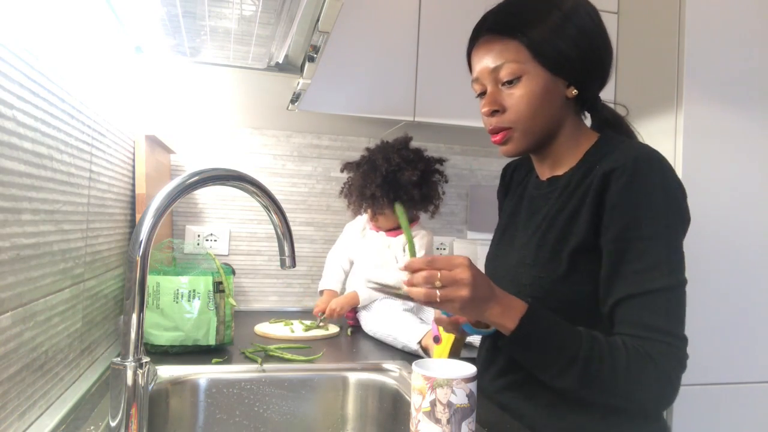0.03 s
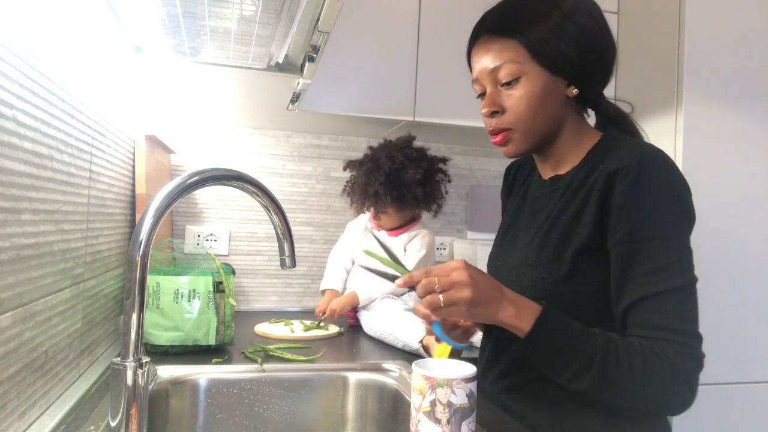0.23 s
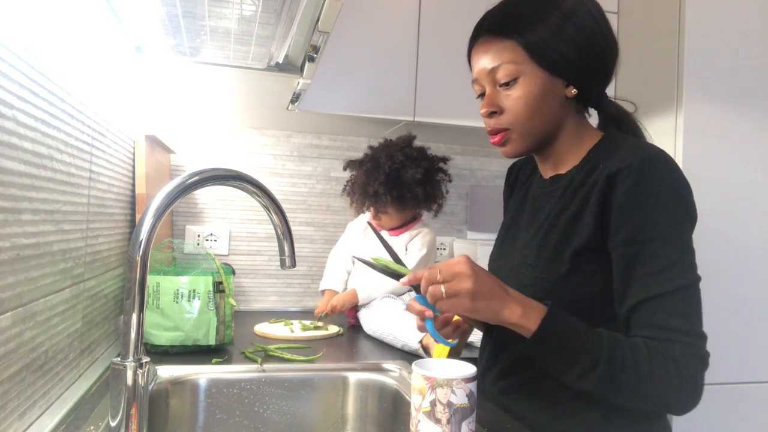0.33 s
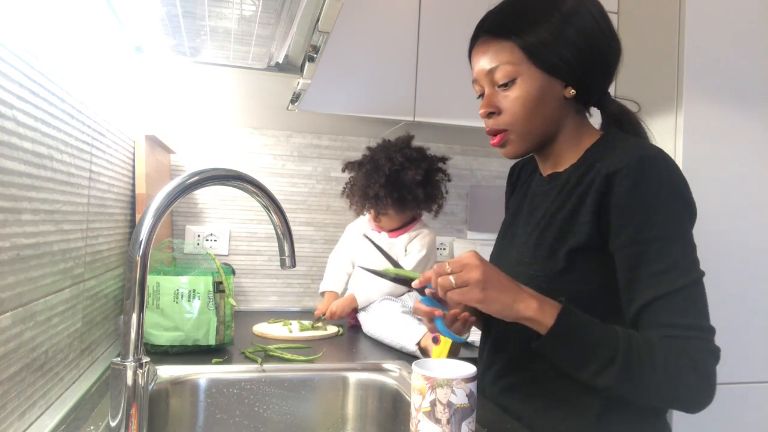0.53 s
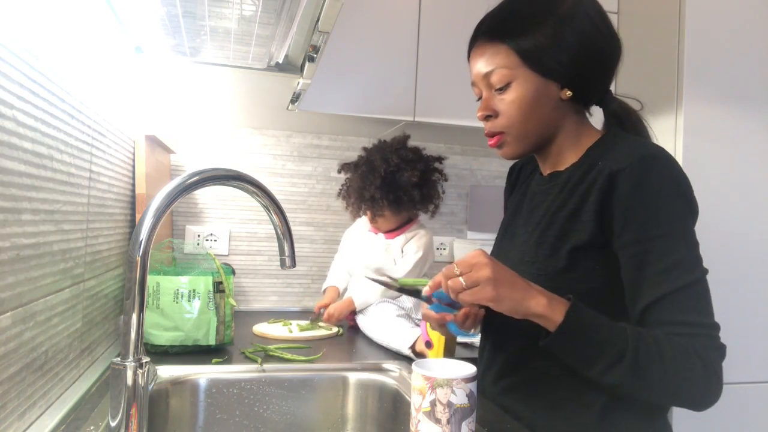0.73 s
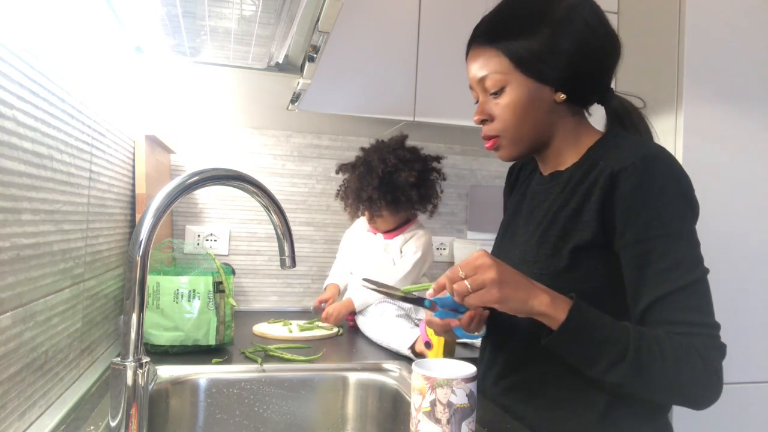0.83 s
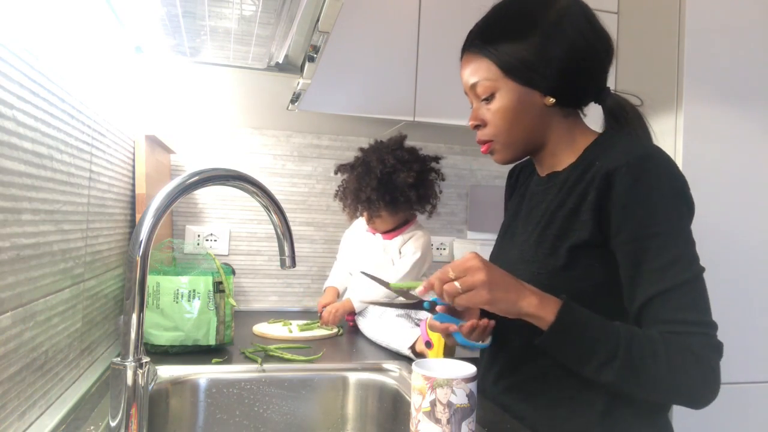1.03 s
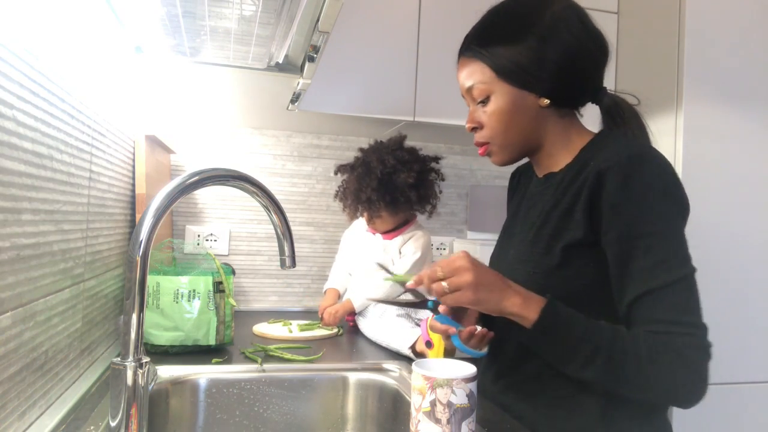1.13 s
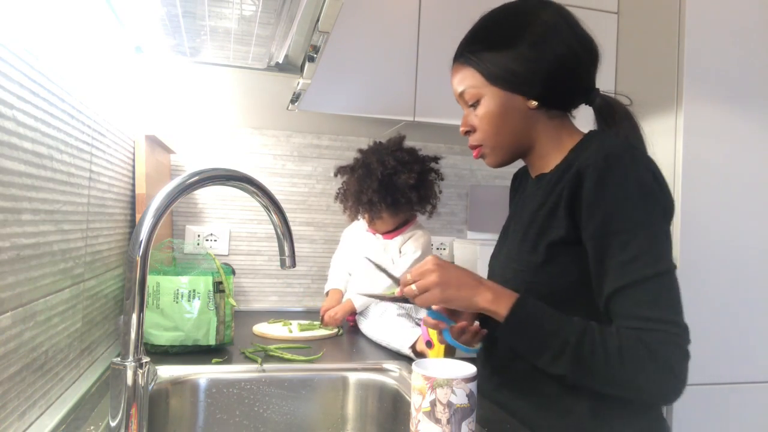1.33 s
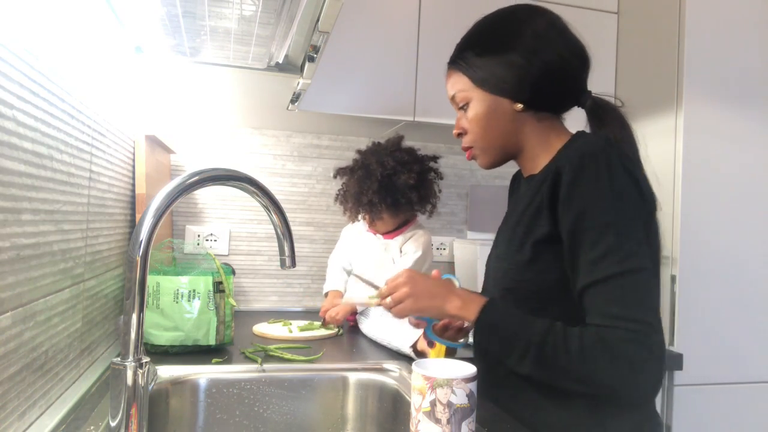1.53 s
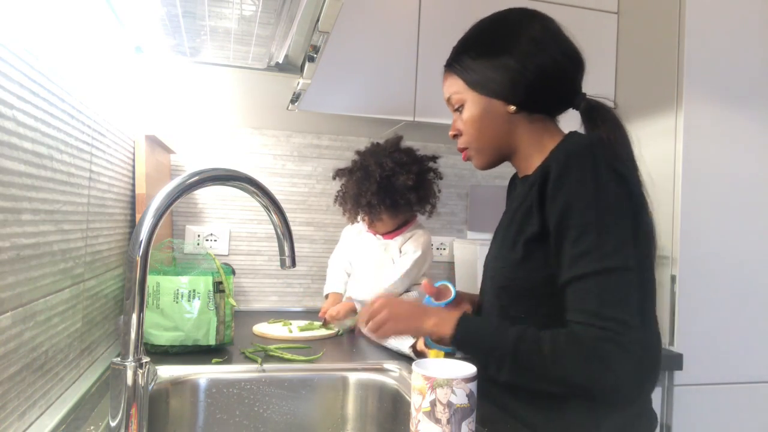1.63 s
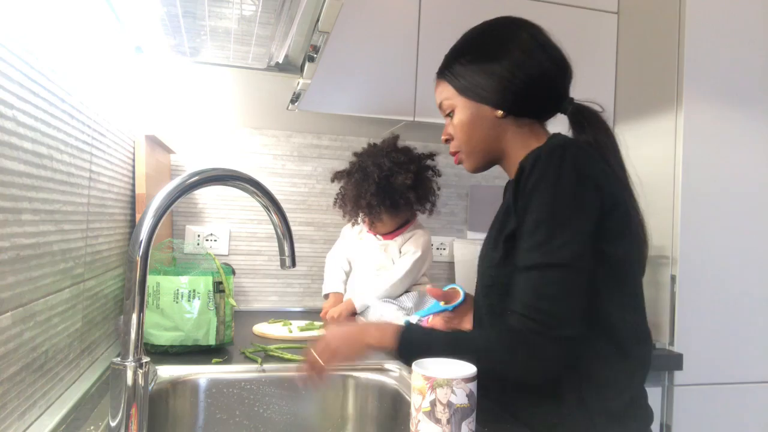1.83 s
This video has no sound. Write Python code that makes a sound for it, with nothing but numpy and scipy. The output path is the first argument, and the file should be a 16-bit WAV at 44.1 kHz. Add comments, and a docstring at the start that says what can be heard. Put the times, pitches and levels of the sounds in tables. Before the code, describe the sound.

Green beans being snipped, with a piece clanging into a metal sink and faint scissor clicks.

```python
"""Snipping green beans over a sink

In a small quiet kitchen, a cut bean end drops into a steel sink and bounces, making it ring.
Scissor blades click and crunch through the fibres of a bean, and the piece lands with a hollow tap.
A softer second cut and light knocks of handling follow, over faint mains hum and room noise."""
import sys
import numpy as np
from scipy import signal
from scipy.fft import rfft, irfft, next_fast_len
from scipy.io import wavfile

SR = 44100
rng = np.random.default_rng(int(sys.argv[2]) if len(sys.argv) > 2 else 0)


def file_out(sig):
    """Save sig as 16-bit WAV at sys.argv[1]."""
    # one column per channel
    cols = np.atleast_2d(sig).T
    # limit, then scale
    lim = np.clip(cols, -1, 1)
    pcm = np.round(lim * 32767).astype(np.int16)
    wavfile.write(sys.argv[1], SR, pcm)


N = 83790
SCENE_TIME = np.arange(N) / SR
EVENT_TIME = np.arange(int(.7 * SR)) / SR  # seconds since the start of one short sound


# Bounces of the bean end: start_s, level_db, high_cut_hz, resonance_q, low_cut_hz, smack_db
BOUNCE_HITS = [(.191, -15.5, 4070, 0.83, 176, -56), (0.3702, -25, 1300, 4.7, 142, -42.5),
               (0.4548, -43, 1170, 7.8, 285, -58)]
# Ringing tones of the steel basin: pitch_hz, level_db, fade_s (time to fall by 60 dB)
BASIN_TONES = [(140.5, -15, 0.36), (233, -15, 0.15), (337.7, -5, 0.18), (369, -1, .1), (404, -5, 0.054),
               (525, -10.5, 0.099), (572, -11.5, 0.061), (632.8, -0.5, 0.1), (854.4, -7, 0.12),
               (910, -5, 0.11), (962, -6.5, 0.061), (1285, -9.5, 0.085), (1623, -9.5, 0.14),
               (1793, -20, 0.11), (1995, -11.5, 0.061), (2240, -16.5, 0.089), (2632, -21, 0.19),
               (3100, -36, .14), (3195, -10, 0.052), (4400, -10.5, 0.067)]
# The basin's many brief tones, blurred into a clang: pitch_hz, level_db
CLANG_SPECTRUM = [(50, -34), (110, -27), (240, 3), (400, -13), (550, -13), (850, -1.5), (1450, -5),
                  (2100, -2), (2800, -6.5), (3200, -2.5), (4200, -4), (5000, -13), (6500, -7),
                  (9000, -29.5), (16000, -3)]
# The wet smack of the bean: pitch_hz, level_db
SMACK_SPECTRUM = [(50, -29), (300, -1), (2500, 11), (5500, 4.5), (9000, -22), (12000, -4), (16000, -13)]

def sink_bounces():
    """Each bounce rings the basin; a softer contact shuts out its high tones."""
    out = np.zeros(N)
    for start_s, level_db, high_cut_hz, q, low_cut_hz, smack_db in BOUNCE_HITS:
        ring = amp(-5) * sum(tone(*row, rise_s=0.00072) for row in BASIN_TONES)
        burst = amp(-1.5) * fade(0.019, rise_s=0.0016, hold_s=0.0042)
        tail = amp(-13) * fade(0.27)
        clang = noise(CLANG_SPECTRUM) * (burst + tail)
        low_cut = lambda hz: (1j * hz / (low_cut_hz + 1j * hz)) ** 2
        high_cut = lambda hz: 1 / (1 - (hz / high_cut_hz) ** 2 + 1j * hz / (high_cut_hz * q))
        basin = filtered(ring + clang, lambda hz: low_cut(hz) * high_cut(hz))
        smack = noise(SMACK_SPECTRUM) * fade(0.051)
        add(out, start_s, amp(level_db) * basin + amp(smack_db) * smack)
    return out


# Sharp clicks of the blades: start_s, level_db, fade_s, tilt_db_per_octave, ring_db
BLADE_CLICKS = [(0.5269, -40, 0.065, 1, -43), (.544, -39.5, .05, -8.5, -58), (.567, -47, 0.081, -10.5, -68),
                (0.7678, -36.5, 0.0075, 13, -56), (0.7702, -51, 0.27, 12.5, -65)]
# The noise of a click in the blades and pivot: pitch_hz, level_db
CLICK_SPECTRUM = [(40, -48), (200, -9.5), (700, -27), (1050, 1.5), (1400, -7), (1800, 0.5), (2300, -1.5),
                  (3000, 0.5), (3900, 0), (4800, -5.5), (6200, -6), (9000, -22), (16000, -28)]
# Steel blades ringing after a click: pitch_hz, level_db, fade_s
BLADE_TONES = [(1780, -5.5, .12), (2690, -7, 0.11), (3280, -5, .12), (3820, -1.5, 0.056)]
# Blades sliding over each other: middle_s, level_db, width_s
BLADE_SLIDES = [(.0, -60, 0.029), (.305, -59, 0.0034), (.365, -58.5, 0.042), (0.388, -53.5, 0.011),
                (.80, -65.5, 0.043), (1.185, -63.5, 0.0079), (1.429, -64.5, 0.042), (1.715, -68.5, 0.025)]
# The hiss of that sliding: pitch_hz, level_db
SLIDE_SPECTRUM = [(300, -4), (1500, 0.5), (3500, 1), (6300, -0.5), (10000, -8), (16000, -9.5)]

def scissor_blades():
    """The blades click and slide, and the pivot gives one tiny squeak."""
    out = np.zeros(N)
    for start_s, level_db, fade_s, tilt_db, ring_db in BLADE_CLICKS:
        ring = sum(tone(*row, rise_s=.0005) for row in BLADE_TONES)
        click = noise(CLICK_SPECTRUM, tilt_db) * fade(fade_s)
        add(out, start_s, amp(level_db) * click + amp(ring_db) * ring)
    sliding = sum(amp(db) * swell(middle_s, width_s) for middle_s, db, width_s in BLADE_SLIDES)
    out += coloured(rng.standard_normal(N), SLIDE_SPECTRUM) * sliding
    squeak = narrow_noise(pitch_hz=13700, width_hz=1200) * swell(middle_s=1.599, width_s=0.0019)
    return out + amp(-58.5) * squeak


# The pod being cut, rubbed or skidding:
# start_s, level_db, onset_s, fade_s, tilt_db_per_octave, ring_hz, ring_db
POD_CRUNCHES = [(0.445, -40.5, 0.0087, 0.12, -7, 1014, 4.5), (0.7379, -51, 0.0017, 0.053, -9.5, 1006, 13),
                (0.758, -54, 0.014, 0.064, -5, 1020, 9), (0.804, -43, 0.0064, 0.035, 4, 1860, 15),
                (1.288, -67, 0.035, 0.36, 1, 2160, 10), (1.42, -55, 0.0087, 0.072, 6, 1290, 19),
                (1.437, -50, .003, 0.073, 4, 905, 25.5)]
# The noise of the pod: pitch_hz, level_db
POD_SPECTRUM = [(150, -13), (500, -10.5), (1000, -2), (1450, 0), (1900, -0.5), (2500, -0.5), (4000, -4.5),
                (7000, -8.5), (10000, -15.5), (16000, -22)]
SNAPS_PER_S, JUICE_GAIN, CRUNCH_Q = 2200, 0.73, 20.6  # a higher Q gives a narrower ring

def bean_crunches():
    """Tiny fibres snap over a juicy hiss, ringing at one pitch at the point of contact."""
    out = np.zeros(N)
    n = len(EVENT_TIME)
    for start_s, level_db, onset_s, fade_s, tilt_db, ring_hz, ring_db in POD_CRUNCHES:
        snaps = unit((rng.random(n) < SNAPS_PER_S / SR) * rng.standard_normal(n))
        juice = JUICE_GAIN * rng.standard_normal(n)
        crackle = coloured(snaps + juice, POD_SPECTRUM, tilt_db)
        peak = lambda hz: 1j * hz / (CRUNCH_Q * (ring_hz - hz ** 2 / ring_hz) + 1j * hz)
        crunch = unit(filtered(crackle, lambda hz: 1 + amp(ring_db) * peak(hz)))
        add(out, start_s, amp(level_db) * crunch * fade(fade_s, rise_s=onset_s / 2, hold_s=onset_s))
    return out


# The tick as the cut piece lands: pitch_hz, level_db
TICK_SPECTRUM = [(100, -23), (1000, -18), (2400, -6), (3600, 3), (4600, -3), (5200, -3), (7500, -6),
                 (10000, -15.5), (16000, -22)]
# The hollow ring of the tap: pitch_hz, level_db, fade_s, rise_s
TAP_TONES = [(173.3, -9.5, 0.4, 0.0099), (208, -4, 0.25, .01), (322, -18, 0.33, 0.0072),
             (1033, -13.5, 0.13, 0.0021), (1237, 3.5, 0.052, 0.0018), (3320, 3, 0.033, 0.00045),
             (3300, -20, 0.34, 0.0023), (3700, -1, 0.025, 0.0014)]
# The blurred ring that lingers: pitch_hz, level_db
TAIL_SPECTRUM = [(90, 2), (350, 1), (600, -18), (1000, -8.5), (1450, 1), (1900, -11), (2600, -19),
                 (3400, -10), (4800, -39), (16000, -33)]

def landing_tap():
    """The piece lands with a tick; high tones sound first, then hollow low ones swell and linger."""
    out = np.zeros(N)
    tick = amp(-48) * noise(TICK_SPECTRUM) * fade(0.068)
    tail = amp(-55.5) * noise(TAIL_SPECTRUM) * fade(0.85, rise_s=0.0077)
    ring = amp(-41) * sum(tone(*row) for row in TAP_TONES)
    add(out, start_s=1, sound=tick + ring + tail)
    return out


# Knocks of the handles and hands: start_s, level_db
KNOCK_HITS = [(1.288, -52.5), (1.316, -62), (1.402, -44), (1.4225, -52), (1.441, -43.5), (1.538, -55.5),
              (1.587, -53), (1.8233, -51)]
# Tones of a knocked handle: pitch_hz, level_db, fade_s
HANDLE_TONES = [(130.4, -14.5, 0.091), (337.3, -2, 0.084), (406, -3, 0.043), (500, -0.5, 0.02),
                (641, -7.5, 0.064), (900, -24, .04)]

def handle_knocks():
    """Handling the scissors makes short dull knocks, each with a faint tick."""
    out = np.zeros(N)
    for start_s, level_db in KNOCK_HITS:
        body = sum(tone(*row, rise_s=0.0004) for row in HANDLE_TONES)
        tick = amp(-13) * noise(POD_SPECTRUM, tilt_db=-4.5) * fade(0.035)
        add(out, start_s, amp(level_db) * (body + tick))
    return out


# Soft low tones around the cuts: middle_s, pitch_hz, level_db, width_s
LOW_SWELLS = [(0.574, 325, -58, 0.022), (.71, 175.7, -63, .03), (1.47, 141, -62.5, 0.055)]

def low_swells():
    """Soft low tones swell and fade."""
    return sum(steady_tone(hz, db) * swell(middle_s, width_s) for middle_s, hz, db, width_s in LOW_SWELLS)


# How long the kitchen echoes: pitch_hz, fade_s
ECHO_FADES = [(150, 0.65), (700, 0.34), (2000, 0.45), (5000, 0.22), (14000, 0.19)]
# How the room colours its echo: pitch_hz, boost_db
ECHO_COLOUR = [(60, 7), (350, 3), (900, 5.5), (2000, 1), (14000, 3.5)]

def kitchen_echo(sound):
    """Tiles and cupboards throw the sound back; each pitch dies away at its own speed."""
    pitches, times, bands = signal.stft(rng.standard_normal(len(EVENT_TIME)), SR, nperseg=256)
    decay = np.exp(-np.log(1000) * times / value_at(ECHO_FADES, pitches)[:, None])
    tail = signal.istft(bands * decay, SR, nperseg=256)[1]
    echo = signal.fftconvolve(sound, tail / np.linalg.norm(tail))[:N]
    out = np.zeros(N)
    add(out, start_s=.006, sound=echo)  # the trip to the walls and back
    return filtered(out, lambda hz: amp(value_at(ECHO_COLOUR, hz)))


# Quiet room noise: pitch_hz, level_db
ROOM_SPECTRUM = [(12, -50), (20, -2.5), (116, -4.5), (192, -6.5), (261, -5.5), (554, -14), (797, -11),
                 (996, -13), (1350, -13), (1690, -18), (2880, -17.5), (3400, -20.5), (8310, -26.5),
                 (10100, -31.5), (15800, -31.5)]
# Its loudness, which dips briefly near the end: time_s, level_db
ROOM_LEVELS = [(0, -59.5), (.15, -62.5), (.7, -62), (1.3, -62.5), (1.55, -62.5), (1.68, -65.5), (1.9, -62)]
# Mains hum of appliances: pitch_hz, level_db
HUM_TONES = [(49, -71), (99, -72), (690, -79.5)]

def background():
    """Room noise, a faint fuzzy whine and the steady hum of appliances."""
    level_db = np.interp(SCENE_TIME, *np.transpose(ROOM_LEVELS))
    air = amp(level_db) * coloured(rng.standard_normal(N), ROOM_SPECTRUM)
    whine = amp(-83) * narrow_noise(pitch_hz=8470, width_hz=150)
    hum = sum(steady_tone(hz, db) for hz, db in HUM_TONES)
    return air + whine + hum


def amp(db):
    """Turn decibels into a number to multiply by."""
    return 10 ** (np.asarray(db) / 20)


def unit(sound):
    """Scale a sound to an average (rms) level of 1."""
    return sound / np.sqrt(np.mean(sound ** 2) + 1e-20)


def value_at(table, hz):
    """Read between the rows of a (pitch_hz, value) table, on a log pitch scale."""
    pitches, values = np.transpose(table)
    return np.interp(np.log(hz + 1), np.log(pitches + 1), values)


def filtered(sound, gain_at):
    """Multiply each frequency in a sound by gain_at(hz)."""
    size = next_fast_len(len(sound) + SR // 2)
    return irfft(rfft(sound, size) * gain_at(np.fft.rfftfreq(size, 1 / SR)), size)[:len(sound)]


def coloured(sound, spectrum, tilt_db=0):
    """Shape a sound by a spectrum, add tilt_db per octave above the bass and scale to level 1."""
    return unit(filtered(sound, lambda hz: amp(value_at(spectrum, hz) + tilt_db * np.log2(1 + hz / 500))))


def noise(spectrum, tilt_db=0):
    """Shaped noise as long as one event."""
    return coloured(rng.standard_normal(len(EVENT_TIME)), spectrum, tilt_db)


def narrow_noise(pitch_hz, width_hz):
    """Noise gathered around one pitch, at level 1."""
    return unit(filtered(rng.standard_normal(N), lambda hz: np.exp(-.5 * ((hz - pitch_hz) / width_hz) ** 2)))


def fade(fade_s, rise_s=0.00016, hold_s=0):
    """A loudness curve that rises and, after hold_s, falls by 60 dB every fade_s."""
    rise = 1 - np.exp(-EVENT_TIME / rise_s)
    return rise * np.exp(-np.log(1000) * np.maximum(EVENT_TIME - hold_s, 0) / fade_s)


def swell(middle_s, width_s):
    """A bell-shaped loudness curve."""
    return np.exp(-.5 * ((SCENE_TIME - middle_s) / width_s) ** 2)


def tone(hz, db, fade_s, rise_s):
    """One fading tone of a struck object."""
    return amp(db) * fade(fade_s, rise_s) * np.sin(2 * np.pi * (hz * EVENT_TIME + rng.random()))


def steady_tone(hz, db):
    """A pure tone as long as the scene."""
    return np.sqrt(2) * amp(db) * np.sin(2 * np.pi * (hz * SCENE_TIME + rng.random()))


def add(track, start_s, sound):
    """Mix a sound into the track at start_s."""
    i = round(start_s * SR)
    track[i:i + len(sound)] += sound[:N - i]


def scene():
    """Mix the sink, scissors and tap, each with its echo, over the background in one channel."""
    sink = sink_bounces()
    cutting = scissor_blades() + bean_crunches() + handle_knocks()
    tap = landing_tap()
    mix = background() + low_swells()
    for sound, echo_db in [(sink, -15), (cutting, -12), (tap, -15)]:
        mix += sound + amp(echo_db) * kitchen_echo(sound)
    return mix[None]


def record(dry):
    """The microphone drops the deepest bass and the highest treble."""
    low_cut_hz, high_cut_hz = 38, 16000
    low_cut = lambda hz: 1 - 1 / (1 + (hz / low_cut_hz) ** 10)
    high_cut = lambda hz: 1 / np.sqrt(1 + (hz / high_cut_hz) ** 200)
    return np.array([filtered(channel, lambda hz: low_cut(hz) * high_cut(hz)) for channel in dry])


dry = scene()
out = record(dry)
file_out(out)
```